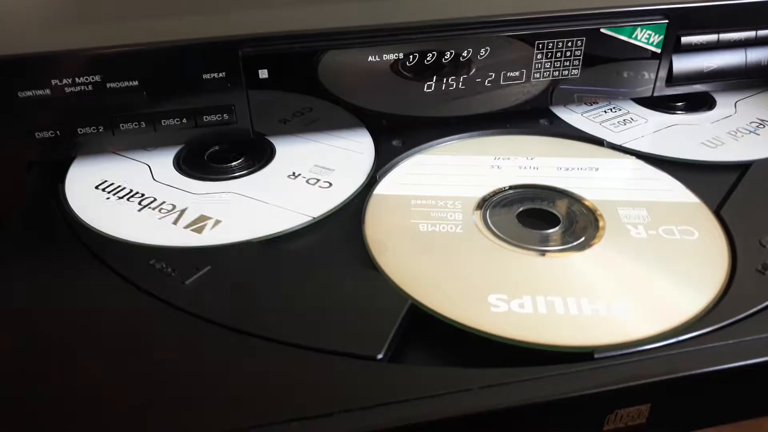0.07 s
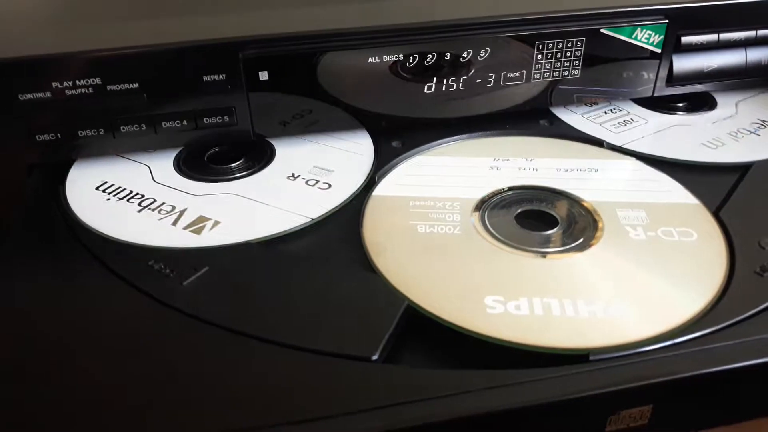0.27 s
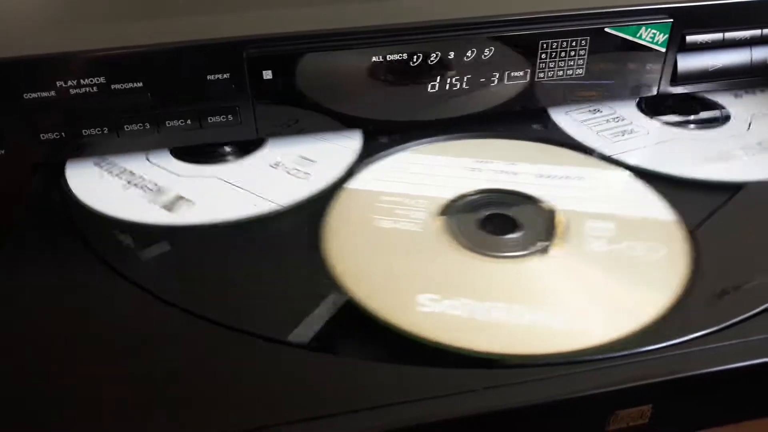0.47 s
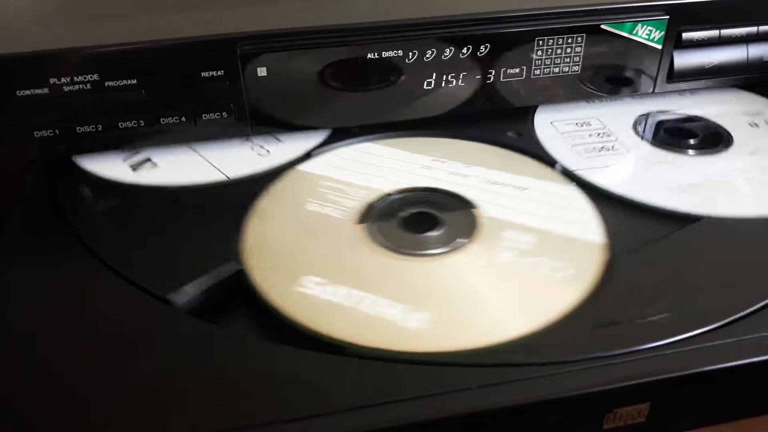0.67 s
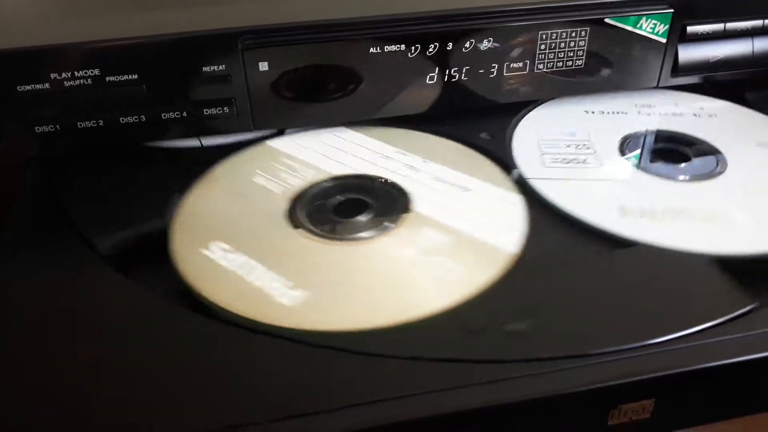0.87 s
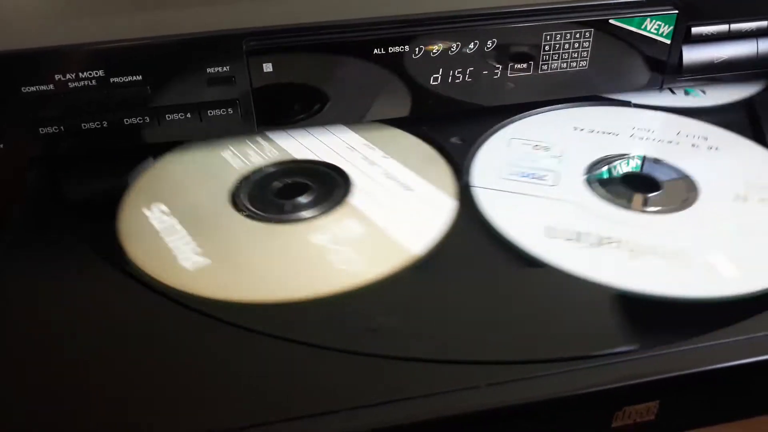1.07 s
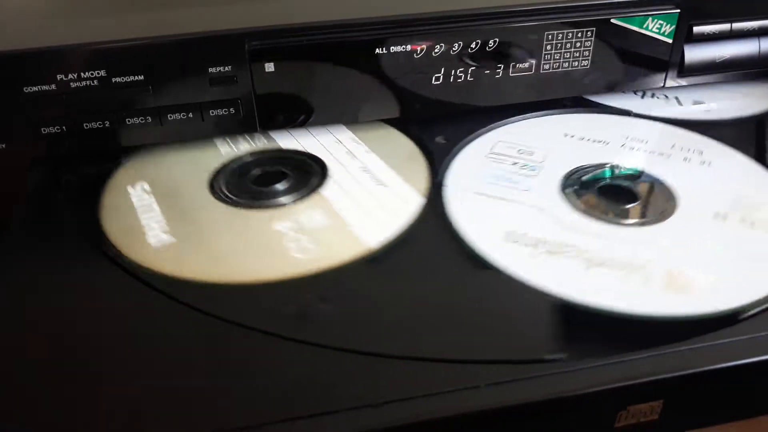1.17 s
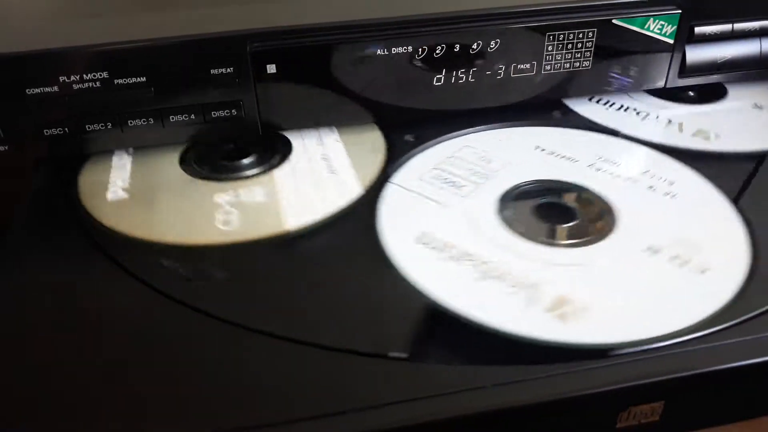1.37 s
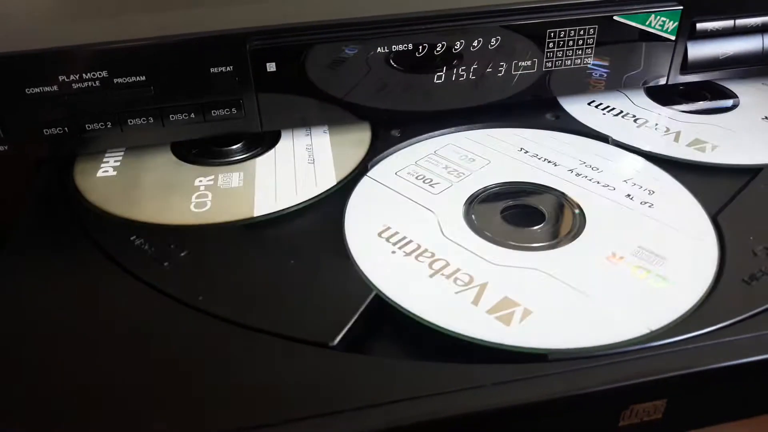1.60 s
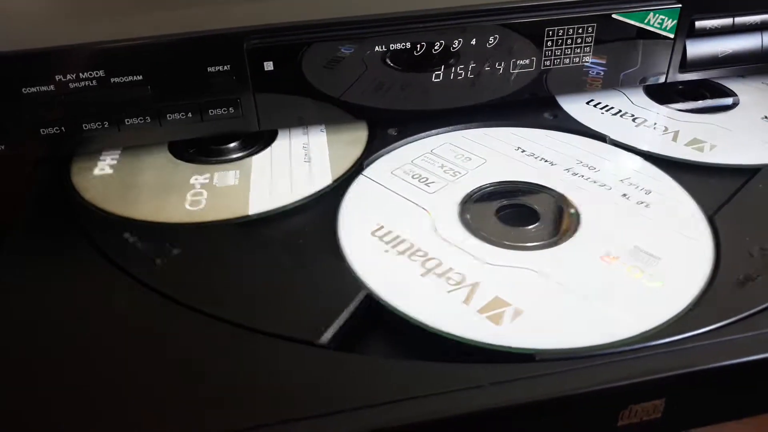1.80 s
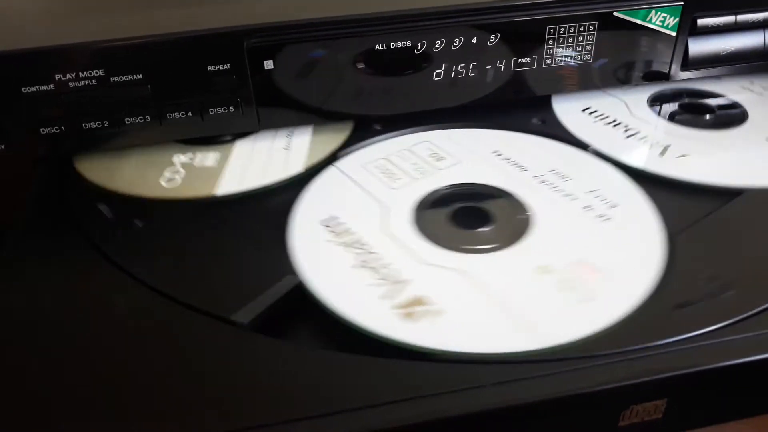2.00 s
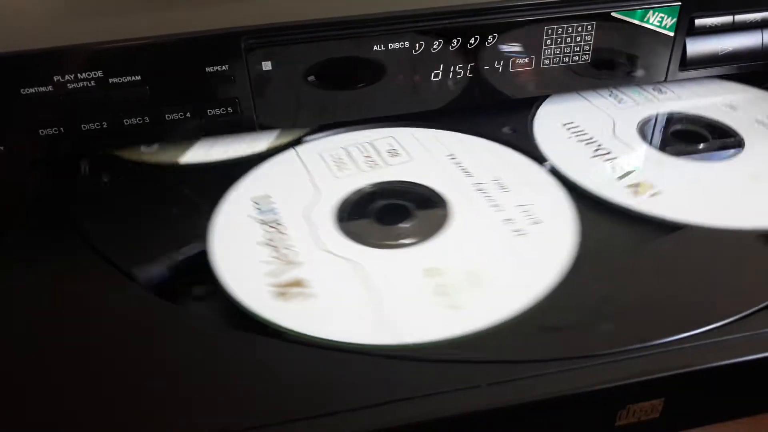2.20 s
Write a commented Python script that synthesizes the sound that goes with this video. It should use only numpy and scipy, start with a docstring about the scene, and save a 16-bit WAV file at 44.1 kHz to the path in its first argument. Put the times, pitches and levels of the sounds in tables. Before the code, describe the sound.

A disc changer's carousel clacks, whirs round on a small motor and bumps to a stop.

```python
"""A disc changer's plastic lock clacks open and its carousel steps round, close by in a small room.
Friction draws a thin squeal from a disc spinning down; then the lock's impacts excite its frame.
A small motor whirs up, its brush and gear noise modulated by the turning shaft, and the gears take up
the tray with a knock. The motor slows, the tray bumps home with a hollow ring, and the next step begins."""
import sys
import numpy as np
from scipy import signal
from scipy.fft import rfft, irfft, next_fast_len
from scipy.io import wavfile
from scipy.ndimage import map_coordinates

SR = 44100
rng = np.random.default_rng(int(sys.argv[2]) if len(sys.argv) > 2 else 0)


def wav_record(signal):
    """Record a signal, one row per channel, as 16-bit PCM in the file named by sys.argv[1]."""
    frames = np.transpose(np.atleast_2d(signal))
    bounded = np.clip(frames, -1, 1)
    # unit amplitude maps onto the largest positive 16-bit level
    quanta = np.round(bounded * 32767).astype(np.int16)
    wavfile.write(sys.argv[1], SR, quanta)


N = 99225
TIME_S = np.arange(N) / SR


def amp(db):
    """Amplitude ratio of a level in decibels."""
    return 10 ** (np.asarray(db) / 20)


def unit(x):
    """Normalisation to rms 1."""
    return x / np.sqrt(np.mean(x ** 2) + 1e-20)


def along(points, hz):
    """Interpolation of (frequency_hz, value) points on a logarithmic frequency axis."""
    knots_hz, values = np.transpose(points)
    return np.interp(np.log(hz + 1), np.log(knots_hz + 1), values)


def curves(rows):
    """Linear interpolation in time: one curve for each column after the first."""
    times, *columns = np.transpose(rows)
    return [np.interp(TIME_S, times, column) for column in columns]


def wobble(rate_hz):
    """Low-pass random modulation: a spline through rate_hz random knots a second."""
    return map_coordinates(rng.standard_normal(4000), [np.arange(N) * rate_hz / SR], mode="wrap")


def swell(centre_s, half_length_s):
    """Gaussian envelope: a smooth rise and fall."""
    return np.exp(-((TIME_S - centre_s) / half_length_s) ** 2)


def burst(start_s, rise_s, t60_s, hold_s=0):
    """Transient envelope: attack, hold and exponential decay."""
    attack = 1 - np.exp(-np.maximum(TIME_S - start_s, 0) / rise_s)
    return attack * np.exp(-np.log(1000) * np.maximum(TIME_S - start_s - hold_s, 0) / t60_s)


def filtered(x, response):
    """Linear filtering: the spectrum of x times a frequency response."""
    size = next_fast_len(N + 8192)
    return irfft(rfft(x, size) * response(np.fft.rfftfreq(size, 1 / SR)), size)[..., :N]


def noise(spectrum, gate=1, tilt=0):
    """Source and filter: white noise, gated, shaped, tilted in dB per octave and scaled to rms 1."""
    source = gate * rng.standard_normal(N)
    return unit(filtered(source, lambda hz: amp(along(spectrum, hz) + tilt * np.log2((hz + 50) / 3000))))


def narrowband(hz, width_hz):
    """Narrow-band noise of rms 1: random quadrature modulation of a steady or gliding carrier."""
    phase = 2 * np.pi * np.cumsum(hz * np.ones(N)) / SR
    return unit(wobble(width_hz) * np.cos(phase) + wobble(width_hz) * np.sin(phase))


def ring(modes, start_s, tilt=0, scatter_db=0.5, rise_s=0.00078):
    """Free vibration of loose parts: damped modes whose levels and phases vary from blow to blow."""
    t, out = np.arange(SR // 2) / SR, np.zeros(N + SR)
    hz, db, t60_s = np.transpose(modes)[:, :, None]
    db = db + tilt * np.log2(hz / 500) + scatter_db * rng.standard_normal(hz.shape)
    walk = np.cumsum(rng.standard_normal((len(hz), len(t))), axis=1)
    drift = 0.075 * walk / np.sqrt(SR / 100)  # rattle: 0.075 cycles rms in 10 ms
    waves = amp(db - 60 * t / t60_s) * np.sin(2 * np.pi * (hz * t + drift + rng.random(hz.shape)))
    out[round(start_s * SR):][:len(t)] = waves.sum(0) * (1 - np.exp(-t / rise_s))
    return out[:N]


# Room noise spectrum: frequency_hz, level_db
FLOOR_SPECTRUM = [(25, -23), (50, -2.5), (90, 4.5), (200, 2), (400, -8.5), (800, -14), (1500, -17.5),
                  (3000, -22), (8000, -17.5), (10000, -55.5), (13000, -22), (15500, -20)]
# Rumble envelope: time_s, level_db
RUMBLE_LEVELS = [(2.1, -92), (2.18, -61.5), (2.25, -52.5)]

def background():
    """Ambient noise: a stationary floor, and a low rumble that swells late."""
    rumble_db, = curves(RUMBLE_LEVELS)
    rumble_spectrum = [(25, -17), (80, -16), (200, -9), (400, -27), (1500, -33), (6000, -70)]
    return amp(-64) * noise(FLOOR_SPECTRUM) + amp(rumble_db) * noise(rumble_spectrum)


# Reverberation time: frequency_hz, t60_s
ROOM_DECAY = [(150, 0.78), (700, 0.41), (2500, .38), (5000, 0.46), (8000, 0.32), (15000, 0.25)]
# Response of the reverberant field: frequency_hz, gain_db
ROOM_RESPONSE = [(200, -3), (2500, 1), (5000, -0.5), (8000, -8), (15000, 0.5)]

def room(x, build_s=0.0029):
    """Reverberation: convolution with diffuse tails in which each frequency decays at its own rate."""
    hz, t, spectra = signal.stft(rng.standard_normal((2, SR // 2)), SR, nperseg=256)
    decay = np.exp(-np.log(1000) * t / along(ROOM_DECAY, hz)[:, None])
    tails = signal.istft(spectra * decay, SR, nperseg=256)[1]
    tails *= 1 - np.exp(-np.arange(tails.shape[1]) / SR / build_s)
    tails /= np.linalg.norm(tails[0])
    blend = np.linspace(0, np.pi / 2, N)  # equal-power crossfade from one tail to the other
    wet = signal.fftconvolve(x * np.array([np.cos(blend), np.sin(blend)]), tails, axes=1).sum(0)[:N]
    return filtered(wet, lambda hz: amp(along(ROOM_RESPONSE, hz)))


# Envelopes of rubbing plastic and of the tray nearing its stop: time_s, level_db
RUB_LEVELS = [(0, -61.5), (.1, -66), (.2, -74), (.3, -103), (2.1, -95), (2.17, -59), (2.25, -68)]
DRAG_LEVELS = [(.85, -95), (1.05, -73.5), (1.24, -69), (1.36, -65), (1.48, -67), (1.53, -65), (1.6, -81)]
# Their spectra: frequency_hz, level_db
RUB_SPECTRUM = [(300, -23), (800, 6), (1500, -10.5), (2800, -1.5), (4000, 0), (5400, -9.5), (7000, -13),
                (8200, -6.5), (9300, -22), (15000, -20)]
DRAG_SPECTRUM = [(300, -17), (550, -7), (720, -3.5), (1050, -5.5), (1350, -17), (2500, -48), (6000, -45)]

def rubbing():
    """Sliding friction: soft broadband noise from plastic parts and the dragging tray."""
    rub_db, = curves(RUB_LEVELS)
    drag_db, = curves(DRAG_LEVELS)
    return amp(rub_db) * noise(RUB_SPECTRUM) + amp(drag_db + 3 * wobble(50.8)) * noise(DRAG_SPECTRUM)


# Squeals of the disc: centre_s, half_length_s, pitch_hz, width_hz, level_db
DISC_SQUEALS = [(0.14, 0.091, 5300, 750, -70), (0.071, 0.058, 6400, 140, -73),
                (0.083, 0.055, 5400, 650, -64.5), (0.11, 0.039, 6550, 490, -65.5),
                (0.16, 0.047, 7000, 700, -60.5)]
# Squeak envelope: time_s, level_db
SQUEAK_LEVELS = [(.14, -100), (.18, -65), (.22, -62), (.29, -57.5), (.34, -60), (.38, -69), (.42, -100)]

def disc(rise_hz_per_s=5000, squeak_hz=8200):
    """Friction-excited vibration: the slowing disc sets off rising bands, then a wavering squeak."""
    squeal = sum(amp(db) * swell(s, half_s) * narrowband(hz + rise_hz_per_s * (TIME_S - s), width)
                 for s, half_s, hz, width, db in DISC_SQUEALS)
    squeak_db, = curves(SQUEAK_LEVELS)
    phase = 2 * np.pi * np.cumsum(squeak_hz + 45 * wobble(280)) / SR
    return squeal + amp(squeak_db + 2.3 * wobble(68)) * np.sin(phase)


# Hum envelope: time_s, level_db
HUM_LEVELS = [(0, -68), (.2, -67), (.3, -56), (.55, -63.5), (.77, -60.5), (.88, -61), (1.25, -60.5),
              (1.36, -87), (1.5, -69), (1.63, -52), (1.72, -70), (1.81, -55.5), (1.98, -62.5), (2.08, -67),
              (2.25, -56)]
# Chassis resonances: pitch_hz, width_hz, relative_level_db
CHASSIS_RESONANCES = [(203.9, 18, -4.5), (309, 12, -8)]
# Broad part of the hum: frequency_hz, level_db
HUM_SPECTRUM = [(50, -19), (110, -14.5), (160, -7), (205, -0.5), (260, -8), (310, -9), (360, -9.5),
                (600, -15), (2000, -43)]

def chassis():
    """Forced vibration: the chassis hums under the motor, with two narrow resonances."""
    hum_db, = curves(HUM_LEVELS)
    resonances = sum(amp(db) * narrowband(hz, width) for hz, width, db in CHASSIS_RESONANCES)
    return amp(hum_db) * (resonances + amp(-2) * noise(HUM_SPECTRUM))


# Passing rasps of the gear train: centre_s, half_length_s, pitch_hz, width_hz, level_db
GEAR_RASPS = [(0.58, 0.11, 2830, 201.6, -71.5), (0.935, 0.36, 4100, 343, -74.5),
              (1.113, 0.14, 2270, 328.6, -69.5), (1.416, .06, 2860, 128.3, -77)]

def gear_rasp():
    """Friction in the gear train: narrow bands of noise swell and fade."""
    return sum(amp(db) * swell(s, half_s) * narrowband(hz, width)
               for s, half_s, hz, width, db in GEAR_RASPS)


# Whine envelope: time_s, level_db
WHINE_LEVELS = [(.22, -95), (.28, -57), (.44, -63.5), (.56, -66), (.9, -72.5), (1.15, -75), (1.3, -68),
                (1.455, -70), (1.52, -100), (1.76, -104), (1.82, -59.5), (1.97, -69), (2.1, -68),
                (2.25, -71)]

def gear_whine(speed, shaft, crawl_hz=1980, sag_hz=50):
    """Modulated narrow-band noise: the whine swells once a turn and sags in pitch at high speed."""
    whine_db, = curves(WHINE_LEVELS)
    pitch_hz = crawl_hz - sag_hz * (speed / speed.max()) ** 2
    return amp(whine_db + 2.4 * wobble(200) + 0.99 * shaft) * narrowband(pitch_hz, width_hz=66)


# Motor run: time_s, shaft_speed_hz, brush_gain_db, gear_gain_db
MOTOR_RUN = [(0, 11, -50, -50), (.22, 10.5, -27, -28), (.28, 19, -27, -7), (.43, 28, -8, 2.5),
             (.54, 36.7, -4, -4), (.68, 36, -3, -1.5), (.9, 34.6, -0.5, 0), (1.07, 37, -4, 0),
             (1.29, 36.3, -2, 0.5), (1.39, 30.3, -5.5, 0.5), (1.48, 26, -11.5, 1), (1.53, 8.8, -24, -13),
             (1.6, 10.4, -24, -40), (1.74, 5.8, -48, -45), (1.8, 22, -16.5, -3), (1.94, 29, -7.5, 2.5),
             (2.05, 35, -2.5, 1), (2.25, 36, -1, 4)]
# Spectra of brush fizz, brush buzz and gear whirr: frequency_hz, level_db
FIZZ_SPECTRUM = [(1000, -8), (3400, -19), (4200, -9), (5500, -10.5), (7600, -11), (8600, 3), (9600, -8.5),
                 (10250, -13.5), (11200, -5.5), (11900, -8), (12450, 1.5), (13200, -33), (14200, -6),
                 (14900, -8), (15800, -12.5)]
BUZZ_SPECTRUM = [(6000, -76), (7700, 4), (8300, 2.5), (8850, 10), (9300, -19), (10200, -3)]
WHIRR_SPECTRUM = [(300, -18.5), (480, -6), (700, -2.5), (1000, -9.5), (1350, -8.5), (1700, 4.5), (1900, 5),
                  (2100, -3), (2400, -8.5), (3200, -14.5), (5000, -28), (9000, -53)]

def motor():
    """Amplitude modulation by rotation: brushes spark six times a turn, gears swell once a turn."""
    speed, brush_db, gear_db = curves(MOTOR_RUN)
    angle = 2 * np.pi * np.cumsum(speed * (1 + 0.0031 * wobble(17.1))) / SR
    segments, poles, shaft = np.cos(6 * angle), np.cos(3 * angle), np.cos(angle)
    sparks = segments + 0.57 * poles + 0.21 * shaft + 0.75 * wobble(330)
    fizz = amp(-57 + brush_db) * noise(FIZZ_SPECTRUM, gate=amp(1.5 * sparks))
    buzz = amp(-66 + 0.55 * brush_db) * noise(BUZZ_SPECTRUM, gate=amp(7 * sparks + 2 * shaft))
    mesh = unit(amp(3.5 * shaft + 2.5 * segments + 1.3 * wobble(120)))
    whirr = amp(-64 + gear_db) * noise(WHIRR_SPECTRUM, gate=mesh)
    return fizz + buzz + whirr + gear_whine(speed, shaft)


# Shudders of the gear train: start_s, level_db
GEAR_SHUDDERS = [(.258, -51.5), (0.412, -49), (1.785, -57), (1.918, -51)]
# Their spectrum: frequency_hz, level_db
SHUDDER_SPECTRUM = [(100, -56), (215, 5.5), (340, -19), (450, -9.5), (560, 5), (640, -0.5), (740, -6),
                    (1100, -12), (1800, -37), (5000, -60)]

def gear_shudder():
    """Transient response to sudden load: a short, low chatter of the gears."""
    return sum(amp(db) * noise(SHUDDER_SPECTRUM) * burst(s, rise_s=0.0013, t60_s=0.083, hold_s=0.038)
               for s, db in GEAR_SHUDDERS)


# Knocks of the tray: start_s, ring_level_db, tick_level_db, ring_tilt_db_per_octave
TRAY_KNOCKS = [(.4068, -65.5, -41, 6), (.4112, -80, -42.5, 8), (1.5275, -56.5, -42.5, 18),
               (1.5385, -43, -45, -5), (1.5475, -49.5, -38.5, -4), (1.5555, -52, -43.5, -9),
               (1.563, -54.5, -38.5, 16), (1.9115, -75, -38.5, -10), (1.917, -60.5, -64, -6.5)]
# Modes of the tray: pitch_hz, level_db, t60_s
TRAY_RESONANCES = [(109.36, -33.5, 0.23), (189.5, 3, 0.13), (286, -7.5, 0.19), (511, -10, 0.21),
                   (625, 0.5, 0.12), (689, 7.5, 0.093), (829, -9.5, 0.15), (948, -4, 0.1),
                   (1033, -14.5, 0.14)]
# Contact tick: frequency_hz, level_db
TICK_SPECTRUM = [(150, -45.5), (400, -3.5), (900, 12), (1400, -0.5), (4500, -3), (7000, -7.5),
                 (10000, -21.5), (15000, -39)]

def tray():
    """Impact excitation of modes: the tray meets its drive or its stop with a tick and a hollow ring."""
    out = np.zeros(N)
    for s, ring_db, tick_db, tilt in TRAY_KNOCKS:
        out += amp(ring_db) * ring(TRAY_RESONANCES, s, tilt, rise_s=0.0027)
        out += amp(tick_db) * noise(TICK_SPECTRUM) * burst(s, rise_s=0.0008, t60_s=0.035)
    return out


# Contacts of the lock: start_s, level_db, crack_tilt_db_per_octave
LOCK_CLACKS = [(0.2168, -30.5, 15), (0.2192, -20, 1), (0.223, -28.5, 1), (1.7363, -20.5, 2),
               (1.7408, -26, -5)]
# Spectra of the contact and of the wash of room reverberation: frequency_hz, level_db
CLACK_SPECTRUM = [(150, -67), (400, -34), (560, -19), (900, -22.5), (1500, -5.5), (2500, 1.5), (3700, -3.5),
                  (4050, -10.5), (4500, 2), (5600, -4.5), (7300, -9.5), (8400, -5), (9800, -29),
                  (12000, -22), (15000, -18)]
WASH_SPECTRUM = [(150, 0), (350, -8.5), (650, -2.5), (900, 1.5), (1500, -2.5), (2500, -0.5), (3800, -5.5),
                 (4800, -6), (6500, -11.5), (9000, -17.5), (15000, -37)]
# Modes of the lock and its frame: pitch_hz, level_db, t60_s
LOCK_RESONANCES = [(681, -1.5, 0.81), (1223.5, 0, 0.53), (1396, -15, 0.14), (1548, -22, 0.23),
                   (1752, 1, 0.15), (2070, -9, .18), (2298, 6, 0.12), (2703, -6, 0.6), (3100, -15, 0.18),
                   (3260, 5, 0.19), (3710, 2, 0.31), (4300, -5, 0.12), (5040, 10, 0.1)]

def lock():
    """Impulsive excitation: plastic cracks, the frame rings, a dense wash of room reverberation trails."""
    out = np.zeros(N)
    for s, db, tilt in LOCK_CLACKS:
        crack = noise(CLACK_SPECTRUM, tilt=tilt) * burst(s, rise_s=0.0001, t60_s=0.016, hold_s=0.0019)
        body = amp(-13) * noise(CLACK_SPECTRUM, tilt=-6) * burst(s, rise_s=0.001, t60_s=0.18)
        wash = amp(-20) * noise(WASH_SPECTRUM) * burst(s, rise_s=0.0077, t60_s=0.36)
        frame = amp(-30.5) * ring(LOCK_RESONANCES, s)
        out += amp(db) * (crack + body + wash + frame)
    return out


# Faint hiss in antiphase between left and right: frequency_hz, level_db
SIDE_SPECTRUM = [(30, 0), (100, 0.5), (300, 4), (1000, -2.5), (8000, 1), (15000, -0.5)]

def scene():
    """Superposition of direct sound, reverberation and ambient noise, nearly mono."""
    clacks = lock()
    knocks = tray() + gear_shudder()
    running = motor() + chassis() + disc() + gear_rasp() + rubbing()
    reverberation = room(amp(-11.5) * clacks + amp(-7.5) * knocks + amp(-9.5) * running)
    mid = clacks + knocks + running + reverberation + background()
    side = amp(-84.5) * noise(SIDE_SPECTRUM)
    return np.array([mid + side, mid - side])


def record(dry):
    """Band limiting and soft saturation: a small microphone loses both extremes and rounds off peaks."""
    low_hz, top_hz, ceiling = 66, 15900, 0.29
    x = signal.sosfilt(signal.butter(2, low_hz, "high", fs=SR, output="sos"), dry)
    x = x / (1 + (x / ceiling) ** 4) ** 0.25
    return filtered(x, lambda hz: np.clip((top_hz - hz) / 200 + 0.5, 0, 1))


dry = scene()
out = record(dry)
wav_record(out)
```